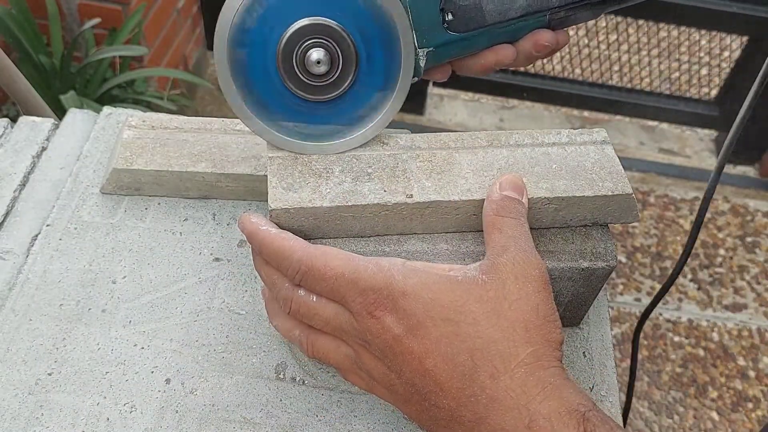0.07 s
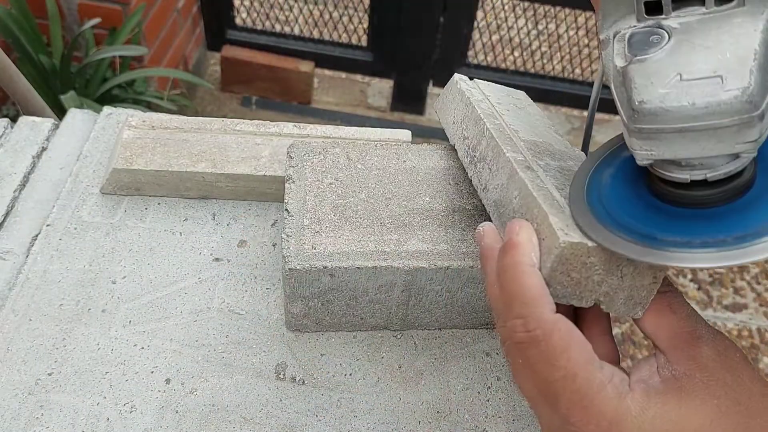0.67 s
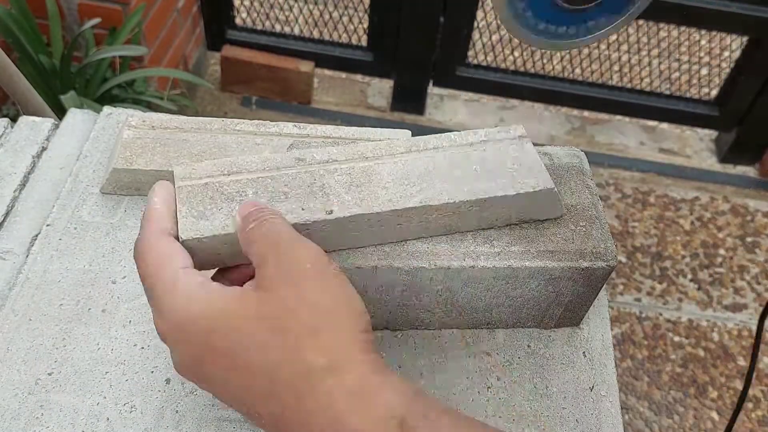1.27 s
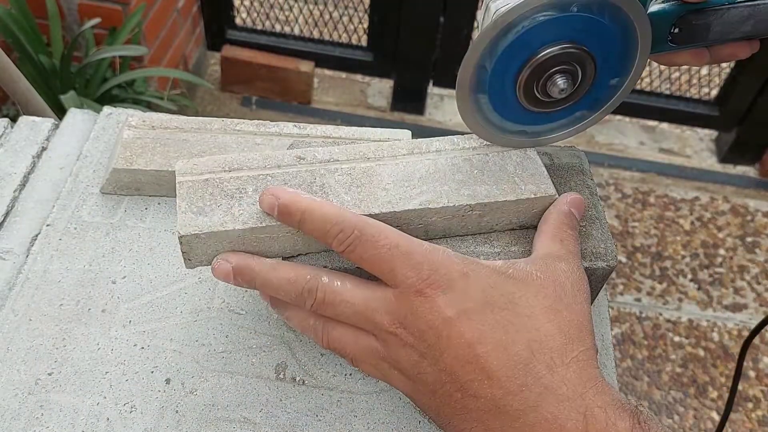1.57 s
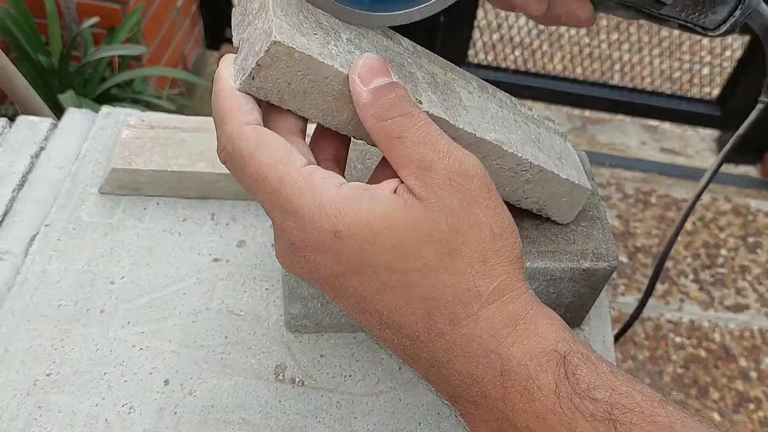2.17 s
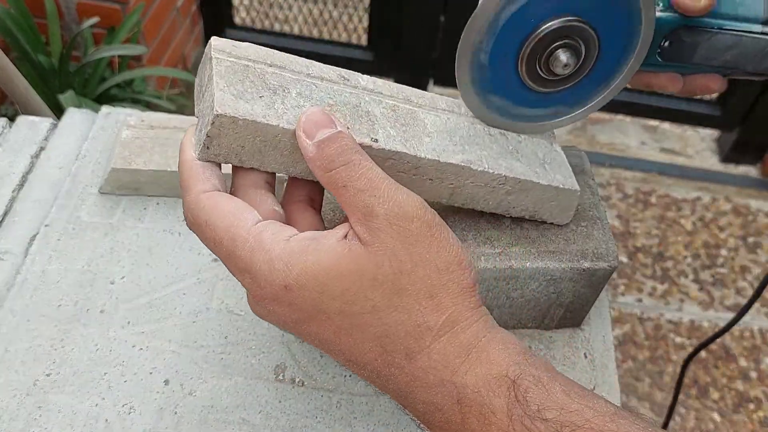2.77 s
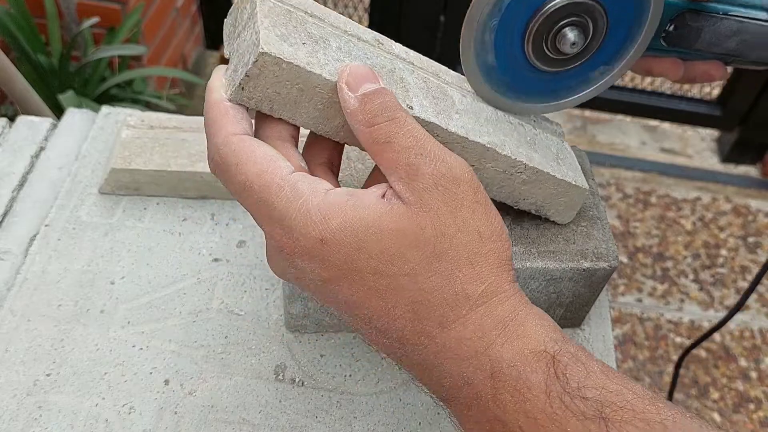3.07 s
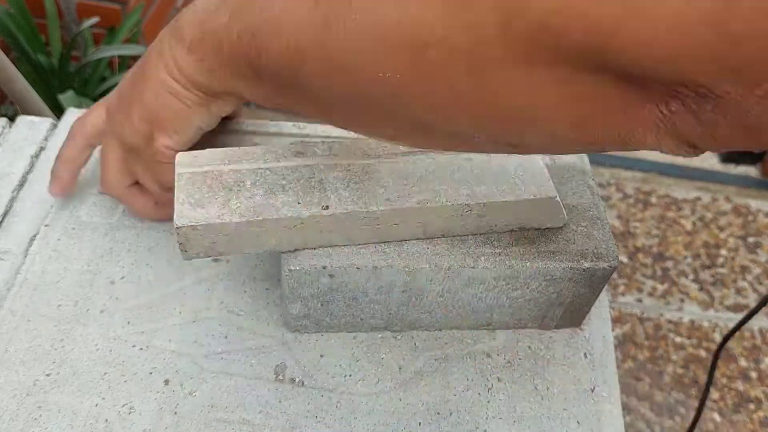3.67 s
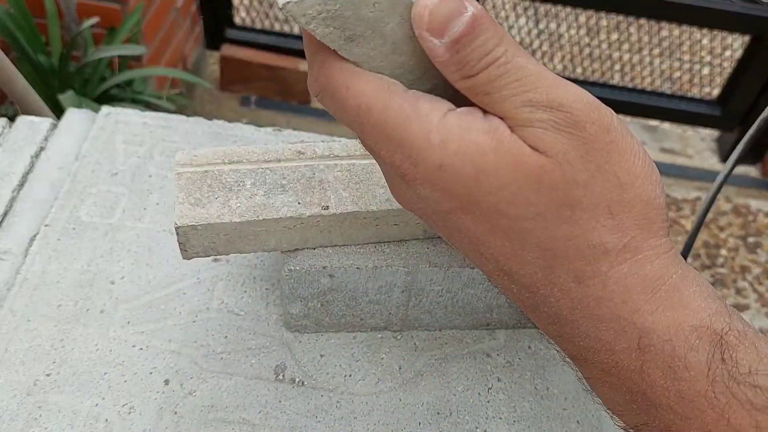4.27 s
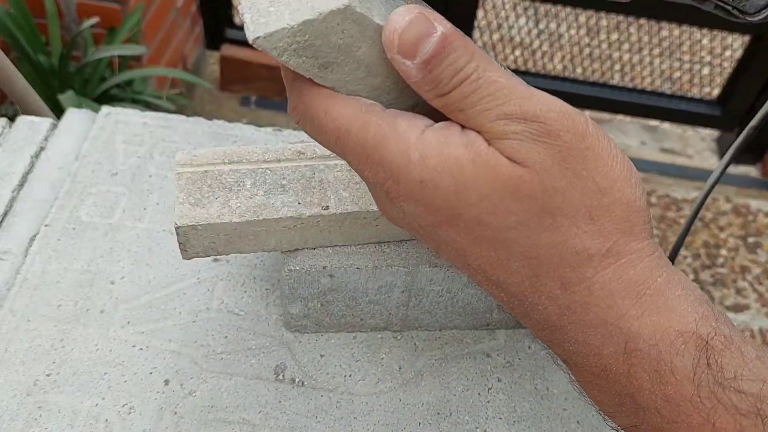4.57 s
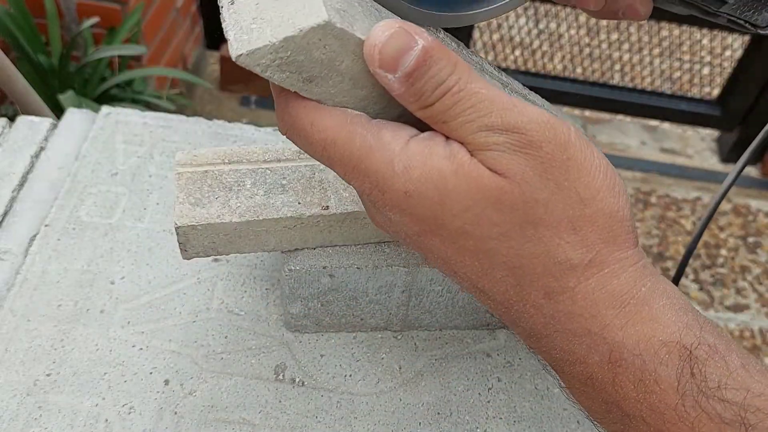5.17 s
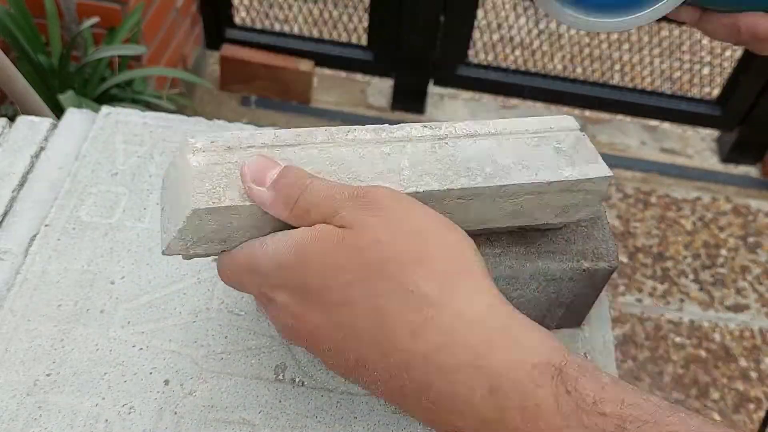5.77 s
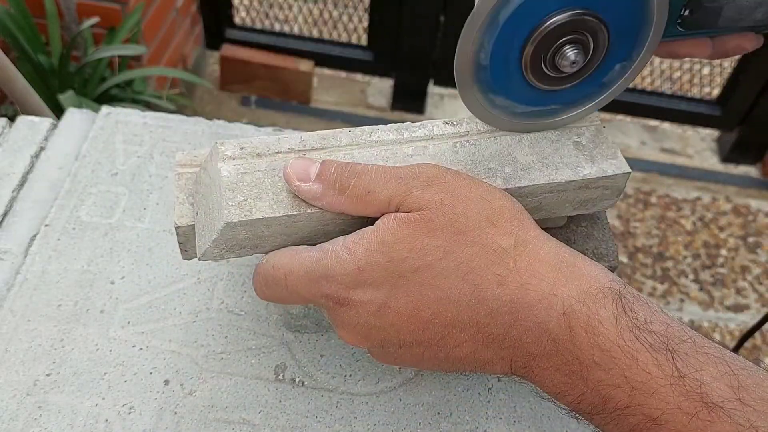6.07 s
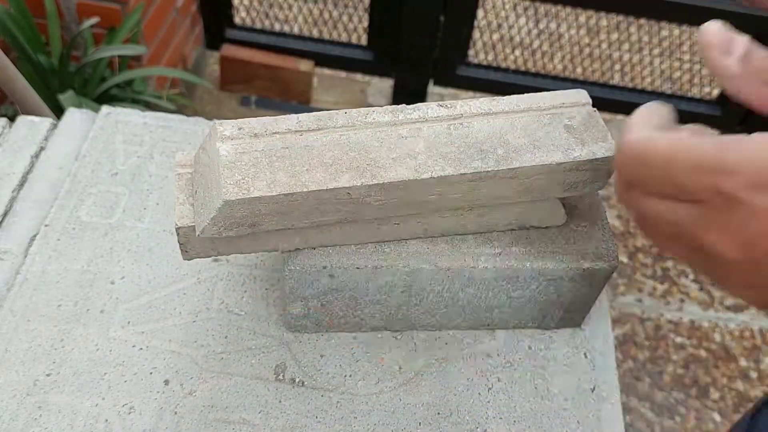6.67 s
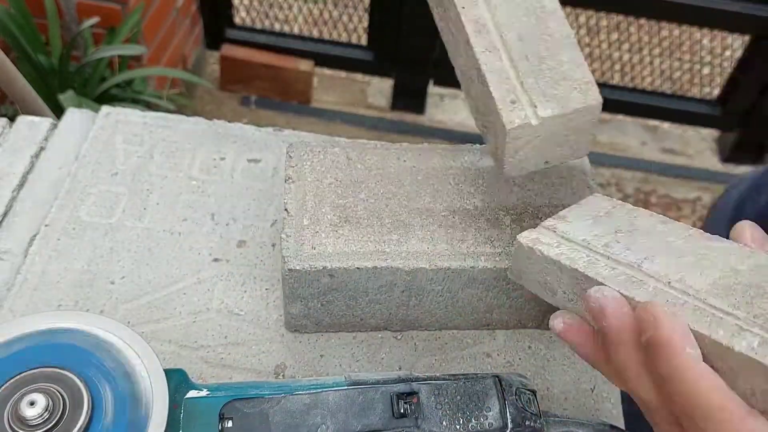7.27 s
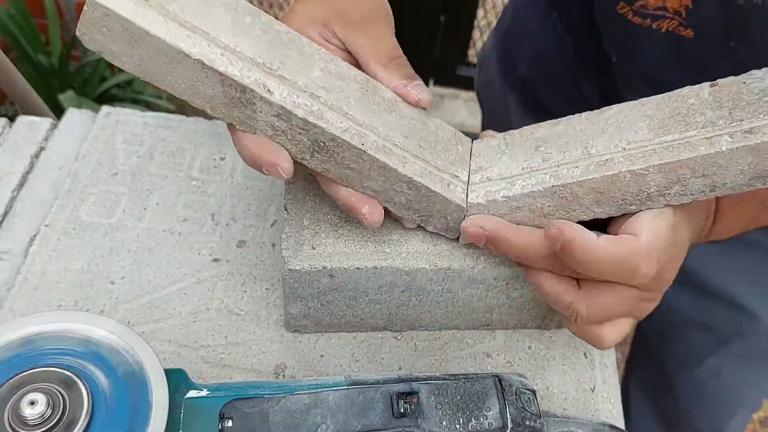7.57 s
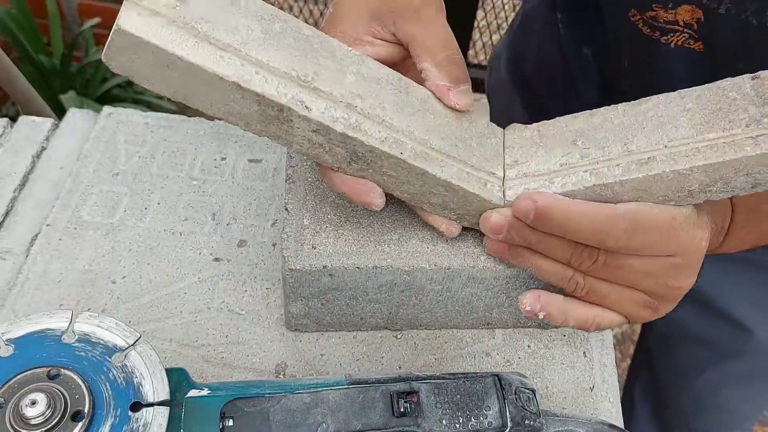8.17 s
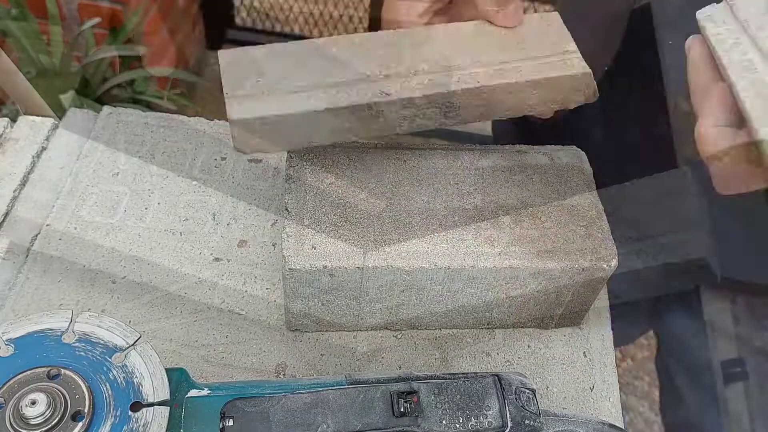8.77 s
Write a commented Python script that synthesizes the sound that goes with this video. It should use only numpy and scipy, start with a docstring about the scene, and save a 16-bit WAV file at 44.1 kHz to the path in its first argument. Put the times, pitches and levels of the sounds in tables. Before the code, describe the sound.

A roaring angle grinder bites into brick in short gritty bursts, then coasts to a rattling stop before a few light brick knocks.

```python
"""Angle grinder cutting a brick

Outdoors, a grinder's fan roars and grit rasps, while friction and impacts excite the modes of the
steel disc and shake the brick. Switched off and laid down, the tool coasts: its unloaded gears rattle
and its disc sings. Traffic rumbles by, and the cut bricks knock together."""
import sys
import numpy as np
from scipy import signal
from scipy.fft import rfft, irfft, next_fast_len
from scipy.io import wavfile
from scipy.ndimage import map_coordinates

SR = 44100
rng = np.random.default_rng(int(sys.argv[2]) if len(sys.argv) > 2 else 0)


def generate_wav(signal):
    """Clip the signal to [-1, 1] and save it as 16-bit WAV at the path in sys.argv[1]."""
    frames = np.transpose(np.atleast_2d(signal))
    scaled = np.clip(frames, -1, 1) * 32767
    pcm = np.round(scaled).astype(np.int16)
    wavfile.write(sys.argv[1], SR, pcm)


N = 393813
T = np.arange(N) / SR
FFT_SIZE = next_fast_len(N + SR // 4, True)
HZ = np.fft.rfftfreq(FFT_SIZE, 1 / SR)

FLAT_FROM_S, FLAT_TO_S = 0.45, 1.3  # the disc's face lies on the brick
OFF_FROM_S, OFF_TO_S = 6.66, 7.01  # the motor is cut
COAST_FROM_S = 6.7  # the gears run unloaded
DROP_FROM_S, DROP_TO_S = 6.78, 6.9  # the rush of air and dust drops quickly
FADE_FROM_S, FADE_TO_S = 7.61, 7.83  # the rush dies away

# Levels in the tables are relative; each source adds its own gain.
# Stereo image of the noise: frequency_hz, side_minus_mid_db
STEREO_WIDTH = [(40, -8), (90, -12), (170, -10.5), (330, -11.5), (700, -1.5), (1300, 0.5), (2400, -5),
                (4400, -0.5), (8000, -0.5)]
# Its balance: frequency_hz, left_minus_right_db
STEREO_LEAN = [(60, 3.5), (150, 1), (350, 0), (700, -4), (1290, 3), (2380, 2.5), (4400, 0), (8120, 1.5),
               (11000, 2.5), (15000, -2.5)]

# Spectra of street rumble and town hiss: frequency_hz, density_db
RUMBLE_SPECTRUM = [(20, -32), (45, -3), (75, 2), (125, -0.5), (170, -7.5), (250, -6), (380, -12.5),
                   (520, -24.5), (1200, -32), (4000, -68)]
TOWN_SPECTRUM = [(400, -1), (800, -3.5), (1300, -11.5), (1900, -6.5), (3200, -17), (6000, -25.5),
                 (10000, -34.5), (15500, -30.5)]
# Their envelopes: time_s, level_db
RUMBLE_LEVELS = [(6.5, -50.5), (6.8, -41.5), (7.05, -53.5), (7.5, -48.5), (7.88, -36), (8.22, -38.5),
                 (8.27, -40.5), (8.48, -37.5), (8.9, -40)]
TOWN_LEVELS = [(7.85, -56), (8.05, -61.5), (8.9, -54)]
# Brief, low pitched swells: peak_s, pitch_hz, level_db
LOW_SWELLS = [(7.82, 255, -42), (7.82, 65, -37), (7.87, 122, -36), (7.94, 66, -38), (7.97, 232, -36.5),
              (8.0, 112, -37), (8.16, 70, -34), (8.2, 122, -37.5), (8.5, 96, -37), (8.61, 258, -40),
              (8.63, 76, -31), (8.73, 255, -38), (8.81, 62, -39)]
# Firing rate of a passing engine: time_s, firing_hz
FIRING_RATE = [(5.5, 60), (6.0, 71), (6.2, 67.9), (6.33, 63), (6.9, 58)]
# Its harmonics: multiple, peak_s, level_db, rise_db_per_s, fall_db_per_s
ENGINE_ORDERS = [(1, 6.31, -31, 71, 80), (2, 6.226, -35, 26.5, 59)]

# Modes of a brick: pitch_hz, width_hz, level_db
BRICK_MODES = [(285, 87, 7.5), (634, 200, 1), (1040, 120, -1), (1320, 140, 5), (1940, 166, 4.5),
               (2460, 222, -5)]
# Brick striking brick: start_s, clack_db, tick_db
KNOCKS = [(7.295, -39, -40), (7.312, -35.5, -48), (7.895, -50, -65), (8.098, -69, -65), (8.221, -52, -62),
          (8.876, -40.5, -70), (8.884, -41, -70)]
# Fingers and stone brushing the cut faces: start_s, length_s, level_db
SCRAPES = [(7.825, .05, -70), (7.93, .03, -73), (7.975, .045, -76), (8.202, .04, -70), (8.24, 0.051, -72),
           (8.435, .055, -72), (8.557, .08, -77), (8.755, 0.05, -69)]
# Spectra of a dry scrape and of the brick's thud: frequency_hz, density_db
SCRAPE_SPECTRUM = [(2000, -9), (7000, -8), (9500, -9), (12000, 0), (15500, 2)]
THUD_SPECTRUM = [(20, -31), (45, -3), (80, 1.5), (170, -1), (330, -5.5), (700, -19.5), (2000, -72)]

# Modes of the gear head: pitch_hz, width_hz, level_db
GEAR_MODES = [(757, 120, -13), (2800, 160, -15), (3714, 130, 1.5), (4770, 76, -15), (7960, 200, -14),
              (10200, 260, -10.5), (10680, 330, -10)]
# Its clanks: start_s, level_db
CLANKS = [(6.8683, -30.5), (6.9665, -28.5), (7.033, -37), (7.104, -39), (7.151, -31), (7.3452, -38),
          (7.357, -45), (7.5457, -34.5)]
# Envelope of its rattle: time_s, level_db
RATTLE_LEVELS = [(6.7, -49), (6.95, -43), (7.18, -41.5), (7.36, -40.5), (7.6, -44.5), (7.7, -47),
                 (7.76, -64), (7.84, -80)]
# Falling whir of the coasting tool: time_s, pitch_hz, level_db
WHIR_GLIDE = [(7.17, 5700, -70), (7.24, 5200, -52), (7.3, 4700, -47), (7.36, 4200, -48), (7.42, 3450, -51),
              (7.47, 2930, -48), (7.53, 2550, -49), (7.65, 1950, -70)]
# Tones of the coasting disc: pitch_hz, fall_hz_per_s, wander_hz
FREE_TONES = [(2870, 95, 49), (3330, 1.7, 13.3), (3800, 160, 23)]
# Their envelopes: time_s, low_tone_db, middle_tone_db, high_tone_db
FREE_TONE_LEVELS = [(6.7, -62, -63, -55), (6.87, -60, -50, -40), (6.94, -66, -58, -47),
                    (6.98, -60, -50, -38), (7.05, -59, -44, -46), (7.17, -46, -48, -46),
                    (7.27, -45, -45, -45), (7.31, -49, -51, -39), (7.36, -53, -38, -40),
                    (7.43, -45, -44, -45.5), (7.6, -56, -49.5, -50), (7.7, -51.5, -50, -47),
                    (7.78, -66, -50, -61), (7.85, -90, -85, -87)]

# Hollow air resonance, shifting as the tool is turned: time_s, pitch_hz, level_db
GROWL_GLIDE = [(.44, 1150, -70), (.52, 1150, -44), (.95, 1127, -49), (1.25, 1220, -58), (1.38, 1265, -49),
               (1.7, 1220, -57), (1.92, 1225, -47.5), (2.25, 1280, -58), (2.6, 1284, -47), (3.6, 1252, -62),
               (3.95, 1228, -44.5), (4.25, 1400, -46.5), (4.6, 1350, -56), (5.3, 1280, -57),
               (6.0, 1228, -51), (6.75, 1250, -60)]
# Lines of the motor's whine: pitch_hz, width_hz, level_db
MOTOR_LINES = [(477.3, 13, -61), (601.7, 46, -54), (1185, 59, -56.5)]
# Spectra of grinding, of coasting and of a chip's crunch: frequency_hz, density_db
GRIND_SPECTRUM = [(60, -19.5), (250, -14), (420, -12), (770, -9.5), (1000, -5.5), (1250, -3), (1950, -6),
                  (2600, -2), (4200, 0.5), (6300, -3), (7800, -3.5), (9200, -11), (11500, -6),
                  (15700, -6.5)]
COAST_SPECTRUM = [(60, -15), (250, -9), (560, -12), (820, -3.5), (1200, -11), (1900, -12.5), (2600, 0.5),
                  (3700, 0), (5000, 0), (7000, -8.5), (9400, -11), (10400, -4), (12000, -6), (15700, -11)]
CRUNCH_SPECTRUM = [(100, -5.5), (1900, -12.5), (3000, -4.5), (4200, -5), (6000, -15.5), (9500, -5.5),
                   (12000, -3.5), (15700, -5)]
# The tool swings nearer and turns away: time_s, roar_db, rasp_db, left_minus_right_db
TOOL_MOTION = [(0.0, -48, -44.5, 2.5), (0.26, -42, -43, -5), (0.34, -51, -46.5, 0.5),
               (0.56, -41.5, -39.5, -4), (1.3, -48, -44.5, 1.5), (1.4, -39.5, -38, 0),
               (1.6, -46, -41.5, -1), (1.88, -43.5, -41, 0), (1.92, -41, -38.5, 0.0),
               (2.03, -41.5, -38, 0.5), (2.25, -46, -42, 1), (2.61, -44, -39, -1.5),
               (3.53, -44.5, -41, 0.5), (3.61, -45.5, -39.5, 0), (3.66, -46, -43, 2.5),
               (3.85, -41.5, -38, -1), (4.7, -44, -40.5, 1), (5.31, -46, -42.5, -0.5), (5.5, -44, -40, 0),
               (5.65, -43.5, -40, -2), (5.82, -43.5, -42.5, -0.5), (5.93, -41.5, -37, -0.5),
               (6.09, -44, -38.5, -1), (6.33, -46, -41, -1.5), (6.6, -44, -41, -0.5),
               (6.75, -40.5, -38.5, 1)]
# Decay of roar, rasp and fizz, a row each: drop_db, sag_db_per_s, fade_exponent
WIND_DOWN = [(-2, 8.5, 0.33), (-7.5, 15.5, 0.79), (-7.5, 23, 1.5)]

# Modes of the disc in three kinds of contact: pitch_hz, width_hz, first_bite_db, flat_db, rim_db
DISC_MODES = [(2914, 35, -16, -17, -9), (3077, 29, -3, -10, -9), (3313, 53, 8, -6, -3),
              (3501, 75, -2, -7, -7), (3803, 66, 1, -8, -2), (4589, 36, 1, -4, -7), (4681, 38, -4, -1, -4),
              (5788, 40, -5, -6, -8), (7158, 44, 1, -1, -4), (7317, 43, -8, -9, -12),
              (7840, 88, 1, -22, -14), (8104, 118, 1, -16, -20), (9179, 58, -8, -10, -13),
              (9740, 118, -11, -5, -13), (10001, 41, -8, -16, -18), (10633, 34, -11, -20, -14),
              (10959, 39, -3, -12, -17), (11433, 39, -7, -10, -15), (11909, 75, -9, -10, -12),
              (12689, 41, -6, -16, -10), (13047, 118, -4, -8, -7), (13307, 118, -4, -6, -7),
              (14140, 53, -6, -3, -9), (14515, 118, -9, -12, -8), (15369, 48, -10, -6, -14),
              (15557, 68, -2, 2, -5)]
# Resonances of the first screech and of the skipping rim: pitch_hz, width_hz, level_db
SCREECH_BANDS = [(3330, 200, 0), (7950, 500, -3.5)]
PING_MODES = [(4680, 25, 0), (5788, 30, -9), (7160, 45, -5)]
# Spells of skipping: start_s, length_s, level_db
SKIPS = [(2.1, 0.3, -46), (2.44, 0.35, -42), (3.36, 0.12, -39), (4.98, 0.22, -40.5)]
# The disc is pressed into the brick: start_s, end_s, ring_db, dust_db, shake_db
CUTS = [(0.03, 0.17, -37, -36, -50), (0.103, 0.337, -32.5, -34.5, -49), (0.423, 0.52, -44, -38, -64),
        (0.48, .77, -37.5, -33, -54), (0.752, 1.02, -35.5, -33, -53.5), (.99, 1.157, -35.5, -36, -52.5),
        (1.11, 1.187, -39.5, -42, -64), (1.475, 1.722, -38.5, -39, -56), (2.123, 2.378, -37, -39, -60),
        (2.414, 2.776, -38, -52, -62), (2.79, 2.894, -44, -42, -54), (3.304, 3.416, -37, -38, -51),
        (3.4, 3.506, -39, -39, -64), (4.113, 4.344, -39, -42, -63), (4.657, 4.829, -40, -38, -54.5),
        (4.924, 5.22, -38, -39, -55.5), (5.362, 5.718, -37.5, -56, -60.5), (6.12, 6.301, -35, -40, -54),
        (6.43, 6.515, -39, -34, -52), (6.698, 6.843, -41, -37, -60)]
# The rim catches hard and jolts the brick: start_s, ring_db, crunch_db, thud_db
CATCHES = [(0.039, -30.5, -49, -57), (0.134, -26.5, -35.5, -60), (0.159, -32, -38, -60),
           (0.183, -26, -34, -54.5), (.222, -42, -27, -56), (0.258, -23, -33, -46), (0.48, -37, -34, -32.5),
           (.672, -39, -36, -49), (0.809, -30, -57, -43), (.835, -34, -37, -40), (0.931, -31, -28, -53),
           (1.51, -32, -29, -46), (1.597, -33, -42, -45), (1.664, -37, -46, -48), (1.691, -24, -36, -58),
           (2.178, -30, -29, -47), (2.272, -34, -29, -48), (2.34, -30, -38, -57),
           (2.445, -36.5, -32.5, -52), (2.5389, -22, -27, -45), (2.573, -24, -41, -60),
           (2.693, -26.5, -32, -63), (2.718, -25, -27, -45), (2.73, -31, -36, -50), (3.018, -30, -36, -61),
           (3.0647, -26, -33, -55), (3.113, -26, -30, -45), (3.1188, -23.5, -34, -47),
           (3.1752, -27, -40, -41), (3.203, -28, -42, -59), (3.228, -24.5, -25.5, -42),
           (3.302, -27.5, -29, -50), (3.367, -28, -29, -47), (3.4306, -29, -39, -62),
           (3.4587, -32, -37, -60), (4.412, -45, -31, -44), (4.477, -30, -28.5, -40), (5.01, -33, -43, -59),
           (5.086, -32, -35, -53), (5.138, -30, -29, -55), (5.193, -26, -27, -43.5), (5.345, -25, -34, -50),
           (5.549, -28, -39, -50), (5.582, -32, -45, -62), (5.64, -24.5, -40, -60), (5.65, -26, -37, -67),
           (5.693, -29, -46, -62), (5.758, -30, -44, -58), (5.966, -35, -40, -60), (6.1483, -29, -33, -39),
           (6.454, -34, -40, -46)]


def amp(db):
    """Amplitude ratio of a level in decibels."""
    return np.exp(np.asarray(db) * (np.log(10) / 20))


def unit_rms(x):
    """Normalisation: the mean of the channels gets rms 1."""
    return x / np.sqrt(np.mean(np.atleast_2d(x).mean(0) ** 2) + 1e-20)


def spectrum_db(points):
    """A spectrum interpolated in log frequency at every FFT bin."""
    hz, db = np.transpose(points)
    return np.interp(np.log(HZ + 1), np.log(hz + 1), db)


def curves(rows):
    """Linear interpolation in time of each column after the first."""
    times, *columns = np.transpose(rows)
    return [np.interp(T, times, column) for column in columns]


def ramp(start, end):
    """Linear rise from 0 to 1, lasting at least 10 ms."""
    return np.clip((T - start) / max(end - start, .01), 0, 1)


def held(start, end, rise, fall):
    """Trapezoidal envelope from start to end."""
    return ramp(start, start + rise) * (1 - ramp(end - fall, end))


def drift(cutoff_hz):
    """Low-pass random fluctuation of rms 1."""
    size = 2 ** 15 if cutoff_hz > 200 else 2 ** 12
    hz = np.arange(size // 2 + 1) * SR / N
    slow = irfft(rfft(rng.standard_normal(size)) / (1 + (hz / cutoff_hz) ** 4))
    return unit_rms(np.interp(T, np.linspace(0, T[-1], size), slow))


def bursts(rows, rise_s, fall_s):
    """Envelope of impacts (start_s, level_db) with exponential rise and decay."""
    out, t = np.zeros(N), np.arange(SR // 4) / SR
    shape = (1 - np.exp(-t / rise_s)) * np.exp(-t / fall_s)
    for start, db in rows:
        part = out[round(start * SR):][:len(t)]
        part += amp(db) * shape[:len(part)] / shape.max()
    return out


def random_impacts(per_s, fall_s):
    """Shot-noise envelope of rms 1: Poisson impacts of random size, each decaying exponentially."""
    hits = (rng.random(N) < per_s / SR) * rng.uniform(0.27, 1, N)
    return unit_rms(signal.lfilter([1], [1, -np.exp(-1 / (fall_s * SR))], hits))


def noise(gain, side_db=0.):
    """Partly coherent stereo noise with a given amplitude spectrum; side_db widens it."""
    mid, side = rng.standard_normal((2, 2 * len(HZ))).astype(np.float32).view(np.complex64)
    side = side * amp(spectrum_db(STEREO_WIDTH) + side_db)
    lean = amp(spectrum_db(STEREO_LEAN) / 2)
    channels = np.array([(mid + side) * (gain * lean), (mid - side) * (gain / lean)], np.complex64)
    return unit_rms(irfft(channels, FFT_SIZE)[:, :N])


def coloured_noise(points, side_db=0.):
    """Stereo noise filtered to a tabulated spectrum."""
    return noise(amp(spectrum_db(points)), side_db)


def narrowband_noise(hz, width_hz):
    """Random quadrature modulation spreads a moving pitch into a stereo band of noise."""
    phase = 2 * np.pi * np.cumsum(hz) / SR
    left, right, shared = (drift(width_hz / 2) * np.cos(phase) + drift(width_hz / 2) * np.sin(phase)
                           for _ in range(3))
    return unit_rms(np.array([left, right]) + shared)


def modal_response(modes, skirt=0.66):
    """Superposition of resonances of alternating sign; a second pole steepens their skirts."""
    grid, response = np.arange(0, SR / 2, 2), 0
    for k, (hz, width, db) in enumerate(modes):
        peak = (-1) ** k * amp(db) / np.sqrt(width)
        detuning = (grid - hz) / width
        response = response + peak / (1 + 2j * detuning) / (1 + 1j * skirt * detuning)
    return np.interp(HZ, grid, response)


def cut_gains(press_s=0.016, lift_s=0.027):
    """Incoherent addition: gains of ring, dust and shake, summed in power over the cuts."""
    power = sum(np.outer(amp(levels) ** 2, held(start, end, press_s, lift_s) ** 2)
                for start, end, *levels in CUTS)
    return np.sqrt(power)


def street(rumble_db=-3., uneven_db=2., swell_s=.032):
    """Amplitude modulation: a low, uneven rumble with brief pitched swells, over the town's hiss."""
    level_db = curves(RUMBLE_LEVELS)[0] + rumble_db + uneven_db * drift(27)
    rumble = amp(level_db) * coloured_noise(RUMBLE_SPECTRUM) * ramp(5.93, 5.94)
    swells = 0
    for peak_s, hz, db in LOW_SWELLS:
        envelope = np.exp(-np.minimum(((T - peak_s) / swell_s) ** 2, 20))
        phase = 2 * np.pi * np.cumsum(hz * (1 + .05 * drift(20))) / SR
        swells = swells + amp(db) * envelope * np.sin(phase)
    hiss = amp(curves(TOWN_LEVELS)[0]) * coloured_noise(TOWN_SPECTRUM)
    return rumble + swells + hiss


def passing_engine(waver_db=3.5, exhaust_db=-10.5):
    """Periodic firing radiates two harmonics; exhaust noise swells and fades with the upper one."""
    phase = 2 * np.pi * np.cumsum(curves(FIRING_RATE)[0] * (1 + 0.044 * drift(23.1))) / SR
    tones = 0
    for multiple, peak_s, db, rise, fall in ENGINE_ORDERS:
        swell = amp(db - np.maximum(rise * (peak_s - T), fall * (T - peak_s))) * ramp(5.5, 5.51)
        tones = tones + swell * amp(waver_db * drift(22)) * np.sin(multiple * phase)
    return tones + amp(exhaust_db) * swell * noise(modal_response([(237, 210, 0)]))


def handled_bricks(grain_db=2.5):
    """Impacts excite heavily damped modes, a dull clack with a gritty tick; friction adds scrapes."""
    clacks = bursts([(s, db) for s, db, _ in KNOCKS], rise_s=0.0018, fall_s=0.0074)
    ticks = bursts([(s, db) for s, _, db in KNOCKS], rise_s=0.00086, fall_s=0.0069)
    strokes = sum(amp(db) * held(s, s + length, .018, .018) for s, length, db in SCRAPES)
    scrapes = strokes * amp(grain_db * drift(300)) * coloured_noise(SCRAPE_SPECTRUM)
    return clacks * noise(modal_response(BRICK_MODES)) + ticks * coloured_noise(GRIND_SPECTRUM) + scrapes


def shaken_brick(idle_db=-74., uneven_db=2., thud_db=-4.5, rock_db=-1., rock_s=0.0055):
    """Forced vibration: cutting shakes the brick on its block, and each catch rocks it with a thud."""
    shake = (cut_gains()[2] + amp(idle_db)) * amp(uneven_db * drift(25))
    jolts = amp(thud_db) * bursts([(s, db) for s, _, _, db in CATCHES], rise_s=0.0081, fall_s=0.0062)
    rocking, t = np.zeros(N), np.arange(SR // 10) / SR
    pulse = t / rock_s * np.exp(1 - t / rock_s)
    for start, _, _, db in CATCHES:
        hz = 88 * rng.uniform(0.57, 1.39)
        rocking[round(start * SR):][:len(t)] += amp(db + rock_db) * pulse * np.sin(2 * np.pi * hz * t)
    return coloured_noise(THUD_SPECTRUM, side_db=12.) * (shake + jolts) + rocking


def gear_rattle(shaft_hz=474.5, slowing_hz_per_s=155, slap_turns=0.2):
    """Backlash: unloaded teeth slap once a turn of the slowing shaft and ring the gear head's modes."""
    speed_hz = shaft_hz - slowing_hz_per_s * np.maximum(T - COAST_FROM_S, 0)
    turns = np.cumsum(speed_hz * (1 + .012 * drift(120))) / SR
    slaps = np.exp(-(turns % 1) / slap_turns) * (1 + 0.75 * random_impacts(40.5, fall_s=0.0062))
    force = slaps * noise(np.ones(len(HZ)))
    gear_head = modal_response(GEAR_MODES)
    ring = unit_rms(irfft(rfft(force, FFT_SIZE) * gear_head, FFT_SIZE)[:, :N])
    rattle = amp(curves(RATTLE_LEVELS)[0]) * ring * held(COAST_FROM_S, 7.86, .05, .05)
    return rattle + noise(gear_head) * bursts(CLANKS, rise_s=0.00067, fall_s=0.0045)


def coasting_whir(whir_db=-5.5, width_hz=120., lower_ratio=.93, lower_db=-2.):
    """Two narrow bands of noise glide steeply down as the grinder coasts and is swung down."""
    hz, db = curves(WHIR_GLIDE)
    pair = narrowband_noise(hz, width_hz) + amp(lower_db) * narrowband_noise(hz * lower_ratio, width_hz)
    return amp(db + whir_db) * pair * held(WHIR_GLIDE[0][0], WHIR_GLIDE[-1][0], .02, .02)


def singing_disc(tone_db=-1., rough_db=3.5, lean_db=6.5, spread_rad=0.78):
    """Free vibration: the coasting disc rings in three wavering tones, the outer two sliding down."""
    out, coasted_s = 0, np.maximum(T - COAST_FROM_S, 0)
    for (hz, fall, wander), db in zip(FREE_TONES, curves(FREE_TONE_LEVELS)):
        phase = 2 * np.pi * np.cumsum(hz - fall * coasted_s + wander * drift(114)) / SR
        gain = amp(db + tone_db + rough_db * drift(50))
        out = out + gain * np.sin(phase + np.outer([.5, -.5], spread_rad * drift(9)))
    return np.sqrt(2) * out * amp(np.outer([.5, -.5], lean_db)) * held(COAST_FROM_S, 7.88, .05, .05)


def air_growl(growl_db=-1.5, width_hz=220.):
    """The rush of air excites one hollow resonance while the motor runs."""
    hz, db = curves(GROWL_GLIDE)
    return amp(db + growl_db) * narrowband_noise(hz, width_hz) * (1 - ramp(OFF_FROM_S, OFF_TO_S))


def reflections(x, echo_gain=0.25, nearest_s=0.0009, farthest_s=.004, count=4):
    """Comb filtering: echoes off brick, hand and table shift the colour as the tool moves."""
    out = x.copy()
    for delay_s in np.geomspace(nearest_s, farthest_s, count):
        for channel in range(2):
            travel_s = delay_s * (1 + 0.13 * drift(1.485))
            out[channel] += echo_gain * rng.choice([-1, 1]) * np.interp(T - travel_s, T, x[channel])
    lag_samples = 2.2 * drift(2.5)  # the tool sways, so its sound reaches one side first
    out[0] = map_coordinates(out[0], [np.arange(N) - lag_samples], order=5)
    return out / np.sqrt(1 + count * echo_gain ** 2)


def fan_and_grit(roar_db=0.3, rasp_db=6., fizz_db=5., dust_db=1., pan_share=0.85):
    """Turbulence and abrasion: fan roar, rasping grit and fizzing dust, over the motor's whine."""
    roar, rasp, pan_db = curves(TOOL_MOTION)
    off, sagged_s = ramp(OFF_FROM_S, OFF_TO_S), np.maximum(T - DROP_TO_S, 0)
    above_roar = 1 / (1 + (2200 / (HZ + 1)) ** 12)
    above_rasp = 1 / (1 + (8500 / (HZ + 1)) ** 16)
    bands = [1 - above_roar, above_roar - above_rasp, above_rasp]
    # the rim meets uneven stone (slow), and single grains snap off (fast)
    rough_db = 0.63 * drift(60) + 0.94 * drift(900)
    levels = [roar + roar_db + rough_db / 2, rasp + rasp_db + rough_db, rasp + fizz_db + rough_db]
    dropped, fade = ramp(DROP_FROM_S, DROP_TO_S), 1 - ramp(FADE_FROM_S, FADE_TO_S)
    gains = [amp(level + drop * dropped - sag * sagged_s) * fade ** exponent
             for level, (drop, sag, exponent) in zip(levels, WIND_DOWN)]
    gains[2] = np.hypot(gains[2], amp(dust_db + rough_db) * cut_gains()[1])  # cuts throw extra dust
    rush = 0
    for band, gain in zip(bands, gains):
        driven, coasting = (noise(np.sqrt(abs(band)) * amp(spectrum_db(points)), side_db=-2.5)
                            for points in (GRIND_SPECTRUM, COAST_SPECTRUM))
        rush = rush + gain * (np.sqrt(1 - off) * driven + np.sqrt(off) * coasting)
    whine_rms = np.sqrt(sum(amp(db) ** 2 for _, _, db in MOTOR_LINES))
    whine = whine_rms * noise(modal_response(MOTOR_LINES)) * (1 - off)
    return (reflections(rush) + whine) * amp(np.outer([.5, -.5], pan_share * pan_db))


def first_bite_screech(start_s=0.087, end_s=0.334, level_db=-36., rough_db=1.5):
    """Friction drives two broad resonances as the rim first tears at the brick's edge."""
    envelope = amp(level_db + rough_db * drift(160)) * held(start_s, end_s, 0.013, .02)
    return envelope * noise(modal_response(SCREECH_BANDS))


def struck_disc(ring_db=-4., decay_s=0.015, uneven_db=4.5, tilt_db_per_octave=-2.5, detune=.003):
    """Impulse response: each hard catch rings a new mix of the disc's modes, damped by the stone."""
    out, t = np.zeros((2, N)), np.arange(SR // 8) / SR
    hz, _, *contact_db = np.transpose(DISC_MODES)
    shape = (1 - np.exp(-t / 0.00062)) * np.exp(-t / decay_s)
    for start, db, _, _ in CATCHES:
        size, tuning, phase, spread = rng.standard_normal((4, len(hz)))
        contact = int(start >= FLAT_FROM_S) + int(start >= FLAT_TO_S)
        gains = amp(contact_db[contact] + tilt_db_per_octave * np.log2(hz) + uneven_db * size)
        angle = 2 * np.pi * (np.outer(hz * (1 + detune * tuning), t) + phase[:, None])
        ring = np.array([gains @ np.sin(angle + side * spread[:, None]) for side in (-.5, .5)])
        out[:, round(start * SR):][:, :len(t)] += amp(db + ring_db) * unit_rms(ring) * shape / shape.max()
    return out


def cutting_disc(ring_db=1., free_db=-14.5, uneven_db=0.74, small_catch_db=-7., ping_db=1.):
    """Forced resonance: grit drives the steel disc, and the kind of contact selects which modes speak."""
    # out of the cut, the spinning disc still sings faintly along with the rasp
    free = amp(curves(TOOL_MOTION)[1] + free_db) * (1 - ramp(DROP_FROM_S, DROP_TO_S))
    force = np.hypot(cut_gains()[0], free) * amp(ring_db + uneven_db * drift(70))
    contacts = [T < FLAT_FROM_S, (T >= FLAT_FROM_S) & (T < FLAT_TO_S), T >= FLAT_TO_S]
    ring = 0
    for k, contact in enumerate(contacts):
        # steady friction sustains the modes and sharpens them to half their width
        modes = [(hz, width / 2, levels[k]) for hz, width, *levels in DISC_MODES]
        ring = ring + contact * noise(modal_response(modes), side_db=1.5)
    # the rim catches on the stone: many small bites and a few hard ones
    small = random_impacts(45., fall_s=0.0075)
    hard = bursts([(s, db) for s, _, db, _ in CATCHES], rise_s=0.00072, fall_s=0.0037)
    crunch = (hard + amp(small_catch_db) * force * small) * coloured_noise(CRUNCH_SPECTRUM)
    skipping = sum(amp(db + ping_db) * held(s, s + length, 0.037, 0.021) for s, length, db in SKIPS)
    pings = skipping * random_impacts(59., fall_s=0.0098)
    sustained = force * (0.71 + 0.14 * small) * ring
    return crunch + sustained + struck_disc() + pings * noise(modal_response(PING_MODES))


def scene(flutter_hz=43.066, flutter_db=0.85):
    """Superposition of the sources, with a fast, even flutter in loudness, about 43 times a second."""
    grinder = fan_and_grit() + air_growl() + cutting_disc() + first_bite_screech()
    grinder = grinder + gear_rattle() + coasting_whir() + singing_disc()
    flutter = amp(flutter_db * np.cos(2 * np.pi * flutter_hz * (T - .003)))
    return grinder * flutter + shaken_brick() + passing_engine() + street() + handled_bricks()


def record(dry, cutoff_hz=15780):
    """Band limiting: a linear-phase low-pass filter removes the highest treble."""
    taps = signal.firwin(801, cutoff_hz, window=("kaiser", 8), fs=SR)
    return signal.oaconvolve(dry, taps[None], "same")


dry = scene()
out = record(dry)
generate_wav(out)
```